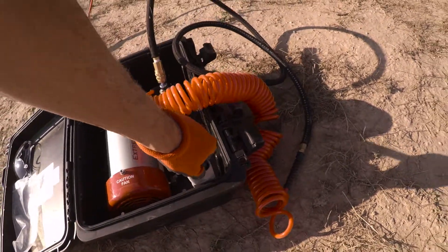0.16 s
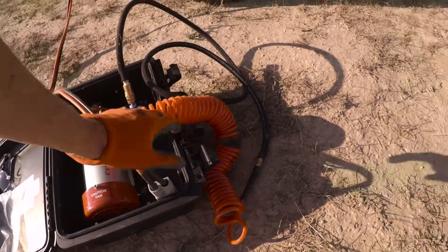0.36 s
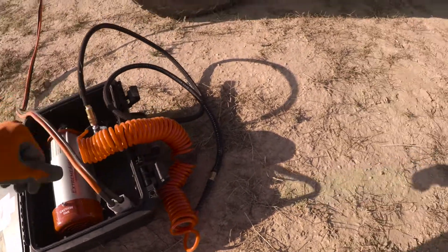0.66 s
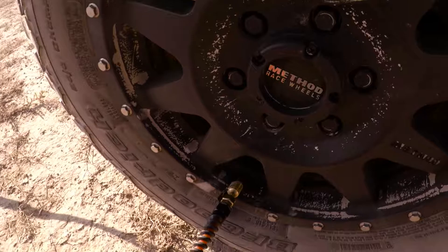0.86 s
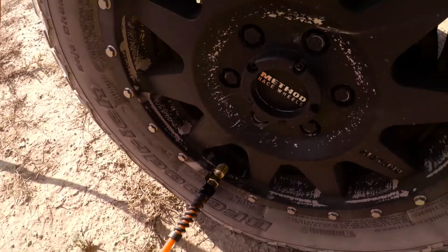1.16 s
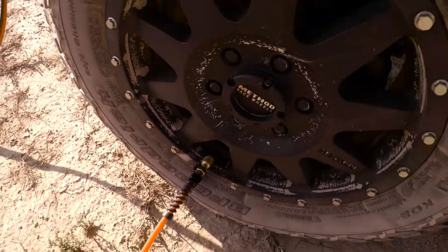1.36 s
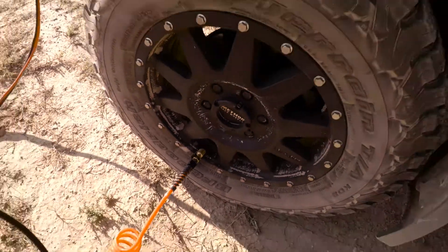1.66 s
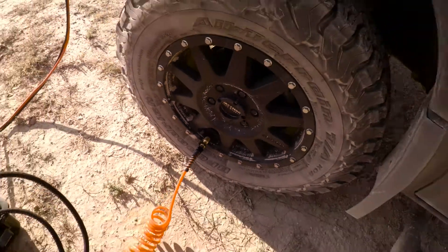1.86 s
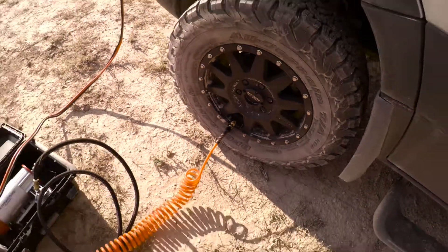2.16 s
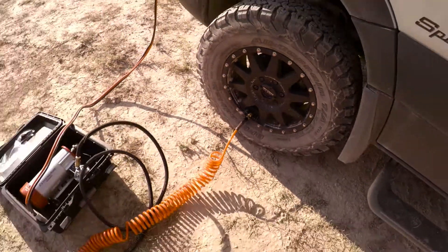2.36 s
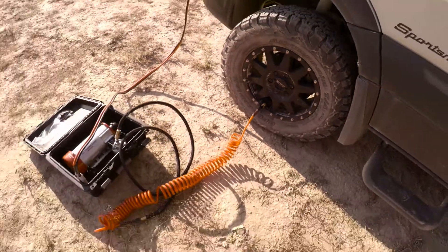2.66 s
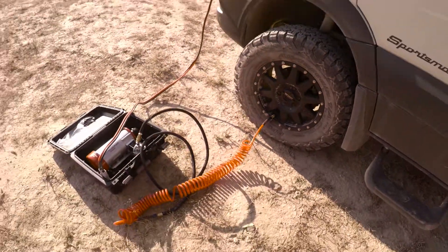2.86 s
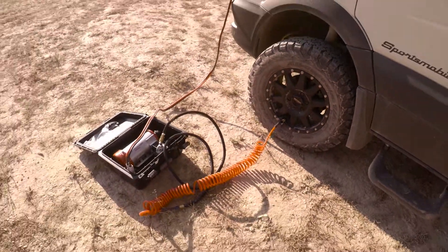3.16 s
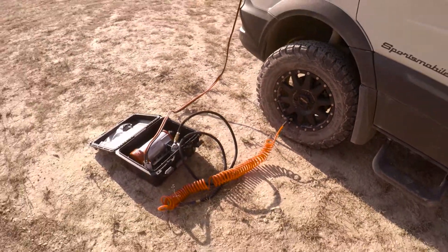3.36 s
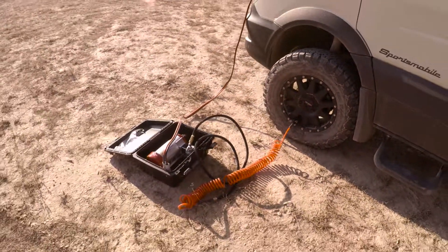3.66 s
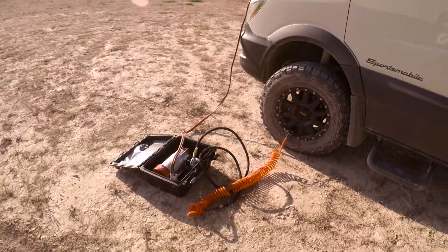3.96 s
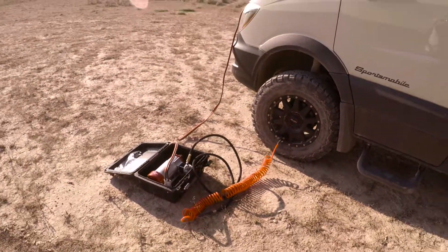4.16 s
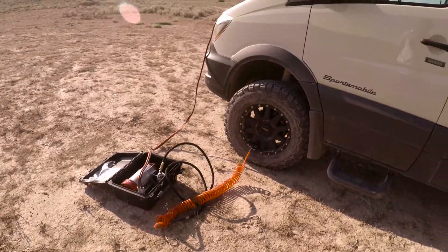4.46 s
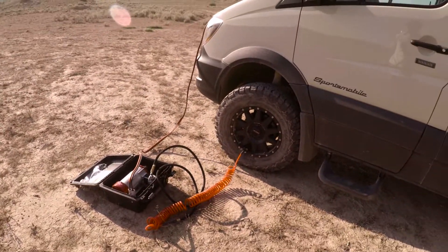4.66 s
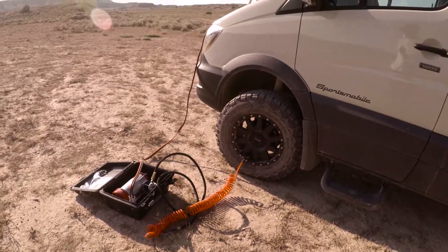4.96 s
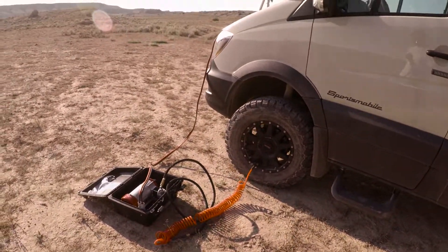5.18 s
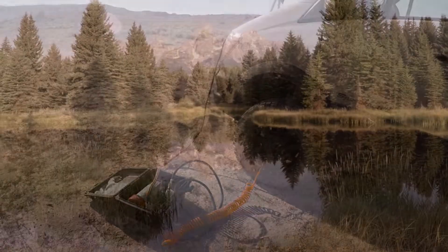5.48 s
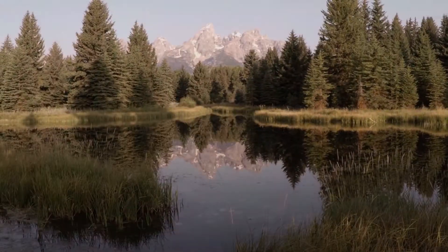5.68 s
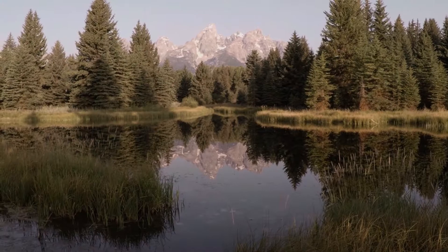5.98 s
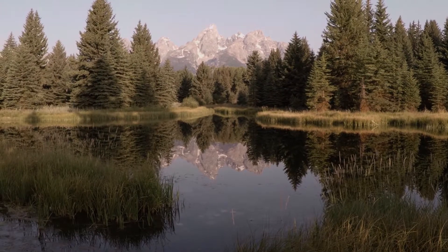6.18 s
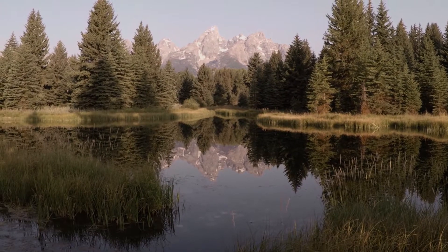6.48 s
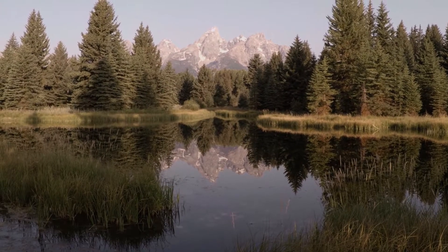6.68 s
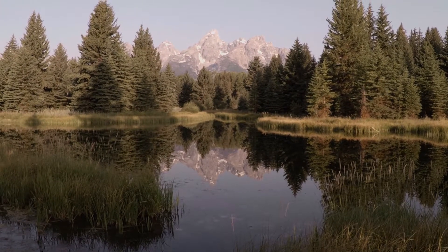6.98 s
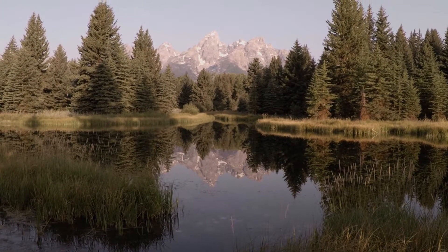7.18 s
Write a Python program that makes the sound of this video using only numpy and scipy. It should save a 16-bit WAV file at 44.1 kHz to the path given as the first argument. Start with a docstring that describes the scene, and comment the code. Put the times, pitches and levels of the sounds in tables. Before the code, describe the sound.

Outdoors, a tyre inflator drones steadily at about sixty-eight strokes per second, centred, dry and close, with low wind rumble. From two to four seconds it moves farther off, then fades out. A wide, much quieter pond scene replaces it: distant bird chatter all round, nearer short chirps, thin whistles, mewing calls and an even two-note warble, lightly echoed by trees, plus tiny water ticks.

```python
"""A portable piston compressor fills a van's tyre on open dirt: a valve click, air thump and motor whirr per turn.
The microphone backs away in a light breeze; the machine fades out, with one last brief swell.
It gives way to a quiet pond among trees, where birds whistle and chirp over small ticks and plops.
The machine is crank harmonics, shaft-locked tones and shaped noise; the birds are bending near sines."""
import sys
import numpy as np
from scipy import signal
from scipy.fft import rfft, irfft, next_fast_len
from scipy.io import wavfile

SR = 44100
rng = np.random.default_rng(int(sys.argv[2]) if len(sys.argv) > 2 else 0)


def put_to_file(sound):
    """Save the sound as 16-bit audio at rate SR, in the file named by the first command-line argument."""
    columns = np.atleast_2d(sound).T  # one column per channel
    safe = np.clip(columns, -1, 1)
    whole_steps = np.round(safe * 32767)
    wavfile.write(sys.argv[1], SR, whole_steps.astype(np.int16))


N = 323253
TIME_S = np.arange(N) / SR

# Crankshaft speed: t/s, f/Hz [turns per s]
CRANK_SPEED = [(0.1, 68.21), (0.8, 68.31), (1.6, 68.39), (2.4, 68.44), (3.1, 68.56), (3.9, 68.49),
               (4.6, 68.62)]
CRANK_HZ = CRANK_SPEED[0][1]
FIRST_STROKE_S = 0.0122
# Piston stroke, close by: harmonic [x crank rate], relative level/dB
STROKE_NEAR = [(1, -8), (2, -8), (3, -2.5), (4, -6.5), (5, -20.5), (6, -5.5), (7, -8), (8, -35.5), (9, -13),
               (10, -13.5), (11, 1), (12, -6.5), (13, 3), (14, 2.5), (15, -0.5), (16, -13), (17, -10.5),
               (18, -16), (19, -46), (20, -19), (21, -38.5), (22, -24), (23, -24), (24, -19), (25, -66),
               (26, -16.5), (27, -18.5), (28, -16), (29, -39.5), (30, -20.5), (31, -19.5), (32, -67)]
# Piston stroke, a few steps off: harmonic [x crank rate], relative level/dB
STROKE_AFAR = [(1, -12), (2, -8), (3, -2.5), (4, -6), (5, -9), (6, -5), (7, -7), (8, -28.5), (9, -14.5),
               (10, -8), (11, 1), (12, -6), (13, 1.5), (14, 0), (15, -1.5), (16, -15.5), (17, -7.5),
               (18, -16.5), (19, -30), (20, -21), (21, -31), (22, -24), (23, -26), (24, -21), (25, -44),
               (26, -18), (27, -23), (28, -19.5), (29, -49), (30, -21), (31, -21.5), (32, -33)]
# Pump and case resonances that ring after each stroke: f/Hz, width/Hz
CASE_MODES = [(100, 88), (745, 58)]
# Intake air spectrum: f/Hz, relative level/dB
INTAKE_SPECTRUM = [(60, -3), (120, -16.5), (170, -2.5), (240, -13), (290, 6), (370, 2), (500, -4),
                   (650, -5.5), (950, -5), (1250, -7), (1550, -14), (1950, -13), (2700, -18), (5000, -24)]
# Valve snap spectrum: f/Hz, relative level/dB
VALVE_SPECTRUM = [(1500, -26), (3000, -4), (5500, -7), (7500, 0), (9000, 7), (11000, -3), (13000, 4),
                  (14100, 4.5), (15200, -20)]
# Whirr spectrum: f/Hz, relative level/dB
WHIRR_SPECTRUM = [(1500, -12), (2300, 0), (3200, 1.5), (4700, 0.5), (7000, -4), (9000, -1), (11200, -8.5),
                  (13000, 0), (15200, -29)]
# Metal pump head modes: f/Hz, width/Hz, lift close by/dB, lift from afar/dB
HEAD_MODES = [(3780, 46, -5, 2.3), (6070, 300, 17, 13.6), (7985, 250, 18, 11.2), (8530, 590, 3, 6.4),
              (10080, 490, 10, 11), (12000, 340, 12.5, 11), (14300, 380, 3, 6.4)]
# Motor tones: order [x crank rate]
WHINE_ORDERS = [48, 58, 61, 86, 87, 88, 90, 116, 117, 120, 140, 145, 147, 149, 176]
# Motor tones, same order: relative level close by/dB, relative level from afar/dB
WHINE_LEVELS = [(-20.5, -11), (-14, -11.5), (-8.5, -11), (-11, -26), (-7.5, -31), (-11, -29), (-11, -9.5),
                (-7.5, -4.5), (-3, -14), (-27, -6), (-31, -26), (-7, -22), (-20, -18), (-16.5, -22),
                (-22, -24)]
# Microphone to machine: t/s, distance/m
DISTANCE = [(0, 0.71), (.35, 0.63), (1.4, 0.79), (2.25, 1.006), (3.1, 1.46), (4.05, 2.78), (5.2, 3)]
NEAR_M, AFAR_M = 0.82, 1.5  # the tone turns from close to distant between these
THUMP_DB, INTAKE_DB, METAL_DB = -34.5, -40, -45.5  # references at one metre
BODY_FALL_DB, METAL_FALL_DB = 6, 5.0  # per doubling of distance
# Machine fade and last swell: t/s, gain [0-1]
FADE = [(4.0, 0.84), (5.03, 0.02), (5.11, 0.1), (5.19, 0.32), (5.2, 0.05)]

# Breeze rumble spectrum: f/Hz, relative level/dB
BREEZE_SPECTRUM = [(1, -15), (4, 1.5), (8, -8), (15, -5), (25, -21), (40, -27), (70, -41.5), (150, -45),
                   (400, -65)]
# Breeze strength on the microphone: t/s, level/dB
WIND = [(0, -32.5), (1.2, -28.5), (1.5, -27.5), (2.6, -29), (3.5, -32.5), (4.1, -46), (4.9, -59),
        (5.15, -59), (5.35, -41), (7.33, -41.5)]
# Buffets on top: t/s, half length/s, lift/dB
BUFFETS = [(0.221, 0.037, 12), (1.372, .04, 9.5), (1.686, 0.014, 10), (2.62, .03, 7), (4.517, 0.053, 10)]

# Forest air spectrum: f/Hz, relative level/dB
FOREST_SPECTRUM = [(35, -32), (60, 1), (123, -5), (215, -9), (298, -7), (368, -8.5), (443, -8), (599, -7),
                   (953, -12), (1350, -12), (2360, -16), (3760, -17), (7200, -29.5), (14500, -42.5),
                   (15500, -36.5)]
POND_DB, POND_IN_S, POND_FULL_S = -52, 4.2, 5.07
# Far birds, strongest from 5.5 to 6.6 s: t/s, relative level/dB
CHORUS = [(4.2, -36), (5.1, -8), (5.5, -0.5), (6.6, 0), (6.9, -6), (7.33, -6)]

# High bird's falling slur: f/Hz
SLUR_HZ = [7650, 6830, 5830, 5390, 5200]
SLUR_START_S, SLUR_EVERY_S, SLUR_S = 4.655, 0.1045, 0.079
SLUR_FIRST_DB, SLUR_GROWTH_DB, SLUR_LAG_MS = -65, 2.5, 0.031
# Long mewing calls: t/s, held f/Hz, level/dB
MEWS = [(4.66, 1680, -64), (5.45, 1605, -63), (6.344, 1660, -59), (7.285, 1680, -53)]
# Mew contour, rising, holding, sagging: pitch [x held pitch]
MEW_SHAPE = [.8, 0.95, 1, 1, 0.98, 0.88]
MEW_S, MEW_LAG_MS = 0.271, 0.041
# Low hoots and whoops across the water: t/s, length/s, first f/Hz, last f/Hz, level/dB
HOOTS = [(4.817, 0.028, 614, 630, -60), (5.295, 0.034, 622, 594, -54.5), (5.433, 0.026, 1000, 1710, -52.5),
         (5.6, 0.053, 453, 510, -56.5), (5.83, 0.055, 441, 530, -53), (6.095, .04, 675, 1040, -54),
         (6.264, 0.046, 820, 1280, -56), (6.316, 0.028, 667, 437, -55), (6.49, 0.03, 717, 570, -53),
         (6.618, 0.016, 1300, 1580, -51), (7.258, 0.019, 614, 560, -53)]
HOOT_LAG_MS = 0.095
# Quick sliding chirps: t/s, length/s, first f/Hz, last f/Hz, level/dB
CHIRPS = [(5.06, .022, 3650, 3240, -58), (5.69, 0.11, 2200, 2480, -61), (5.759, .02, 4150, 3870, -53),
          (5.833, 0.045, 2330, 2880, -56), (5.948, 0.03, 3650, 4320, -56), (6.011, .032, 3990, 3380, -52.5),
          (6.045, 0.032, 3880, 3420, -57), (6.706, .02, 4300, 3600, -52), (7.025, .048, 5900, 4350, -58.5),
          (7.092, 0.028, 4280, 4590, -49)]
CHIRP_LAG_MS = 0.13
# Thin whistles on one pitch: t/s, length/s, f/Hz, level/dB
WHISTLES = [(5.115, 0.058, 2075, -58), (5.358, 0.024, 2970, -61), (5.649, 0.031, 2950, -62.5),
            (5.869, 0.065, 2940, -52.5), (6.054, .052, 3090, -54.5), (6.497, 0.16, 5960, -73),
            (6.722, 0.15, 4270, -66), (6.735, 0.18, 5860, -66.5), (6.881, .07, 3070, -67),
            (6.98, 0.18, 5890, -65), (7.13, .2, 3980, -66.5), (7.185, .055, 4360, -58),
            (7.2, 0.051, 3070, -64), (7.24, .1, 5900, -70)]
WHISTLE_LAG_MS = 0.04
# Calls that arch up and down: t/s, length/s, top f/Hz, level/dB, right-side lag/ms
ARCHES = [(5.198, .092, 5330, -59, .02), (5.472, 0.041, 3730, -53, 0.14), (5.51, 0.033, 3780, -55, 0.14),
          (5.777, 0.036, 3490, -51, 0.14), (5.809, .044, 3620, -53, .125),
          (7.229, .108, 5800, -51.5, 0.057)]
# Arch contour: pitch [x top pitch]
ARCH_SHAPE = [.77, .91, 1, .91, .71]
# Ticks and plops by the water: t/s, centre f/Hz, 60 dB ring time/s, peak level/dB
TICKS = [(5.227, 69, 0.029, -45.5), (5.379, 5360, 0.0029, -39), (6.202, 5800, 0.011, -44.5),
         (6.249, 1700, 0.018, -46), (6.277, 2000, 0.031, -41.5), (6.306, 1400, 0.018, -46),
         (6.413, 8000, .012, -48), (6.80, 1860, 0.027, -42.5), (6.905, 1590, 0.037, -43)]
# Warbler's falling note: f/Hz
ROCK_DOWN_HZ = [3120, 3030, 2770]
# Warbler's rising note: f/Hz
ROCK_UP_HZ = [2980, 3450, 3960]
ROCK_START_S, ROCK_EVERY_S, ROCK_UP_AFTER_S = 6.139, 0.0915, 0.02
ROCK_DOWN_S, ROCK_UP_S, ROCK_DB, ROCK_LAG_MS = 0.023, 0.026, -53, 0.14
# Echoes off the trees: delay/s, relative level/dB
TREES = [(.023, -9), (.047, -22), (.083, -12), (.131, -21), (0.191, -15)]
CUTOFF_HZ = 15500


def from_db(db):
    """Amplitude gain."""
    return 10 ** (np.asarray(db) / 20)


def rms_one(x):
    """Scale to rms 1."""
    return x / np.sqrt(np.mean(x ** 2) + 1e-20)


def in_time(rows):
    """A two-column curve at every sample."""
    s, values = np.transpose(rows)
    return np.interp(TIME_S, s, values)


def colour(x, spectrum):
    """Filter by a spectrum interpolated over log frequency."""
    size = next_fast_len(N)
    hz, db = np.transpose(spectrum)
    bins_hz = np.maximum(np.arange(size // 2 + 1) * SR / size, 1)
    gain = from_db(np.interp(np.log(bins_hz), np.log(hz), db))
    return irfft(rfft(x, size) * gain, size)[:N]


def noise(spectrum):
    """Coloured noise, rms 1."""
    return rms_one(colour(rng.standard_normal(N), spectrum))


def drift(knots_per_s, size=8192):
    """Random curve through straight segments, rms 1."""
    knots = rng.standard_normal(size)
    return rms_one(np.interp(TIME_S * knots_per_s, np.arange(size), knots))


def resonance(x, hz, width_hz):
    """Two-pole band-pass, gain about 1 at its peak."""
    r = np.exp(-np.pi * width_hz / SR)
    zeros = np.array([1, 0, -1]) * (1 - r * r) / 2
    poles = [1, -2 * r * np.cos(2 * np.pi * hz / SR), r * r]
    return signal.lfilter(zeros, poles, x)


def each_turn(turns, harmonics, size=4096):
    """One waveform, rms 1, repeated every turn."""
    shape = rms_one(irfft(np.r_[0, harmonics], size))
    return np.interp(turns % 1 * size, np.arange(size + 1), np.r_[shape, shape[0]])


def thump(turns, far, push_lead_turns=0.07, puff_lag_turns=0.1144, wobble_turns=0.00072,
          wander_db=1.13, push_harmonics=8):
    """The piston's low push, then a puff of air; pump and case resonances set the harmonics' phases."""
    shaky = turns + wobble_turns * drift(60)
    out = np.zeros(N)
    for k, ((_, near_db), (_, far_db)) in enumerate(zip(STROKE_NEAR, STROKE_AFAR), 1):
        gain = from_db(near_db + far * (far_db - near_db) + wander_db * drift(3.94))
        lead = push_lead_turns if k <= push_harmonics else -puff_lag_turns
        ring_phase = sum(2 * np.arctan(2 * (k * CRANK_HZ - hz) / width_hz) for hz, width_hz in CASE_MODES)
        out += gain * np.cos(2 * np.pi * k * (shaky + lead) - ring_phase)
    return rms_one(out)


def intake_air(turns, suck_db=3, suck_turn=0.73):
    """Intake noise that swells once per turn."""
    return noise(INTAKE_SPECTRUM) * from_db(suck_db * np.cos(2 * np.pi * (turns - suck_turn)))


def valve(turns, jitter_turns=0.0002, bounce_db=-12, bounce_s=0.00041):
    """One dry snap per turn plus a very short noise chatter as the reed settles."""
    angle = turns + jitter_turns * drift(68)
    # Steps up by one as the valve opens, with sub-sample timing
    steps = np.floor(angle) + np.minimum(angle % 1 * SR / CRANK_HZ, 1)
    snaps = np.diff(steps, prepend=steps[0]) * from_db(1.1 * drift(68))
    settling = signal.lfilter([1], [1, -np.exp(-1 / (bounce_s * SR))], snaps + 1e-18)
    chatter = rms_one(settling * rng.standard_normal(N))
    return rms_one(colour(rms_one(snaps) + from_db(bounce_db) * chatter, VALVE_SPECTRUM))


def whirr(turns, far, hiss_db=-13, harmonics=226):
    """Gear and brushes rattle alike each turn, hardest just after the valve; the metal head resonates."""
    shaky = turns + 0.00022 * drift(45)
    angle = shaky % 1
    rattle = each_turn(shaky, np.exp(2j * np.pi * rng.random(harmonics)))
    hiss = from_db(hiss_db) * rng.standard_normal(N)
    burst_db = 7 * (1 - far / 2) * np.exp(-angle / 0.12)
    load = from_db(burst_db + 2.3 * np.cos(2 * np.pi * (angle - 0.2)))
    sound = colour(load * (rattle + hiss), WHIRR_SPECTRUM)
    for hz, width_hz, near_db, far_db in HEAD_MODES:
        lift = from_db(near_db + far * (far_db - near_db)) - 1
        sound = sound + lift * resonance(sound, hz, width_hz)
    return rms_one(sound)


def whine(turns, far, throb_db=0.3, throb_turn=0.0655):
    """Thin shaft-locked motor tones, louder after each snap; their balance changes with distance."""
    out = np.zeros(N)
    for order, (near_db, far_db) in zip(WHINE_ORDERS, WHINE_LEVELS):
        waver_db, slip_rad = 1.2 * drift(7), 0.4 * drift(12)
        gain = from_db(near_db + far * (far_db - near_db) + waver_db)
        out += np.sqrt(2) * gain * np.sin(2 * np.pi * order * (turns - throb_turn) + slip_rad)
    return out * from_db(throb_db * np.cos(2 * np.pi * (turns - throb_turn)))


def compressor(valve_db=-5.5, whirr_db=-1.0, whine_db=-2, valve_lead_turns=0.02205):
    """All parts follow one crankshaft, weaken with distance and fade together."""
    turns = np.cumsum(in_time(CRANK_SPEED)) / SR - FIRST_STROKE_S * CRANK_HZ
    early = turns + valve_lead_turns
    metres = in_time(DISTANCE)
    doublings = np.log2(metres)
    far = np.clip((metres - NEAR_M) / (AFAR_M - NEAR_M), 0, 1)
    body = from_db(THUMP_DB) * thump(turns, far) + from_db(INTAKE_DB) * intake_air(turns)
    metal = from_db(valve_db) * valve(early)
    metal += from_db(whirr_db) * whirr(early, far)
    metal += from_db(whine_db) * whine(turns, far)
    body *= from_db(-BODY_FALL_DB * doublings)
    metal *= from_db(METAL_DB - METAL_FALL_DB * doublings)
    return (body + metal) * in_time(FADE)


def breeze(gusty_db=2.5, gust_knots_per_s=7):
    """Low noise on the microphone that swells at random, with a few harder buffets."""
    lift_db = sum(db * np.exp(-((TIME_S - s) / half_s) ** 2) for s, half_s, db in BUFFETS)
    return noise(BREEZE_SPECTRUM) * from_db(in_time(WIND) + gusty_db * drift(gust_knots_per_s) + lift_db)


def sing(notes, waver=0.0065, flutter_db=2.5, edge=0.32, shade_db=12):
    """Notes (t/s, length/s, pitches/Hz, level/dB, right-side lag/ms): near sines bent through pitches."""
    out = np.zeros((2, 2 * N))  # room for notes that overrun
    bend = 1 + waver * drift(250)
    flutter = from_db(flutter_db * drift(120))
    for s, length_s, pitches, db, lag_ms in notes:
        at = int(s * SR) + np.arange(int(length_s * SR))
        contour = np.polyfit(np.linspace(0, 1, len(pitches)), pitches, len(pitches) - 1)
        hz = np.polyval(contour, np.linspace(0, 1, len(at))) * bend[at % N]
        cycles = np.cumsum(hz) / SR - np.outer([0, lag_ms / 1000], hz)
        pan_db = shade_db * (cycles[0] - cycles[1])  # the far side is shaded, more so for high notes
        gain = np.sqrt(2) * from_db(db + np.outer([1, -1], pan_db) / 2)
        out[:, at] += gain * signal.windows.tukey(len(at), edge) * np.sin(2 * np.pi * cycles)
    return out[:, :N] * flutter


def far_calls(low_hz, high_hz, level_db, count, spread_db=9, glide=0.112, widest_lag_ms=0.19):
    """Faint short glides from all round the pond, at random times and pitches."""
    when, pitch, slope, size, span, side = rng.random((count, 6)).T
    hz = low_hz * (high_hz / low_hz) ** pitch
    step = 1 + glide * (2 * slope - 1)
    starts_s = POND_IN_S + when * (N / SR - POND_IN_S)
    lengths_s = 0.0127 + 0.0268 * span
    levels_db = level_db - spread_db * size
    lags_ms = widest_lag_ms * (2 * side - 1)
    return sing(zip(starts_s, lengths_s, np.c_[hz / step, hz * step], levels_db, lags_ms))


def slur_run(count=5):
    """Evenly spaced falling slurs in a crescendo."""
    return [(SLUR_START_S + k * SLUR_EVERY_S, SLUR_S, SLUR_HZ,
             SLUR_FIRST_DB + k * SLUR_GROWTH_DB, SLUR_LAG_MS) for k in range(count)]


def mews():
    """Long calls that rise, hold and sag."""
    return [(s, MEW_S, hz * np.array(MEW_SHAPE), db, MEW_LAG_MS) for s, hz, db in MEWS]


def slides(rows, lag_ms):
    """Notes that glide straight from first to last pitch: hoots or chirps."""
    return [(s, length_s, [first, last], db, lag_ms) for s, length_s, first, last, db in rows]


def whistles():
    """Thin notes on one pitch."""
    return [(s, length_s, [hz], db, WHISTLE_LAG_MS) for s, length_s, hz, db in WHISTLES]


def arches():
    """Calls that bend up to a top pitch and down again."""
    return [(s, length_s, hz * np.array(ARCH_SHAPE), db, lag_ms) for s, length_s, hz, db, lag_ms in ARCHES]


def rocking_song(count=6):
    """A warbler's overlapping pair, falling then rising, at an even pace."""
    starts_s = ROCK_START_S + ROCK_EVERY_S * np.arange(count)
    down = [(s, ROCK_DOWN_S, ROCK_DOWN_HZ, ROCK_DB, ROCK_LAG_MS) for s in starts_s]
    up = [(s + ROCK_UP_AFTER_S, ROCK_UP_S, ROCK_UP_HZ, ROCK_DB, ROCK_LAG_MS) for s in starts_s]
    return down + up


def birds():
    """The nearer birds; the whistles waver less in pitch."""
    bending = slur_run() + mews() + slides(HOOTS, HOOT_LAG_MS) + slides(CHIRPS, CHIRP_LAG_MS)
    bending += arches() + rocking_song()
    return sing(bending) + sing(whistles(), waver=0.0038)


def ticks(breadth=0.38, size=4096):
    """Short dying noise bursts, each through a broad resonance with steep sides."""
    out = np.zeros(N)
    for s, hz, t60_s, db in TICKS:
        burst = rng.standard_normal(size) * from_db(-60 * TIME_S[:size] / t60_s)
        for _ in range(2):
            burst = resonance(burst, hz, breadth * hz)
        start = int(s * SR)
        out[start:start + size] += from_db(db) * burst / np.abs(burst).max()
    return out


def trees(x, tail_db=-9, t60_s=0.21, echo_db=-2.5):
    """A few discrete echoes and a thin scattered tail."""
    response = rng.standard_normal(SR) * from_db(-60 * TIME_S[:SR] / t60_s)
    response *= from_db(tail_db) / np.linalg.norm(response)
    for delay_s, db in TREES:
        response[int(delay_s * SR)] += from_db(db + echo_db)
    return signal.fftconvolve(x, response)[:N]


def pond(air_db=-1.5, side_db=-3):
    """Forest air and far chatter fade in; nearer calls and ticks echo off the trees."""
    air = noise(FOREST_SPECTRUM) + from_db(side_db) * noise(FOREST_SPECTRUM) * np.array([[1], [-1]])
    chatter = far_calls(2700, 4400, level_db=-5, count=90, glide=0.147)
    chatter += far_calls(480, 2287, level_db=-2, count=60)
    fade_in = np.clip((TIME_S - POND_IN_S) / (POND_FULL_S - POND_IN_S), 0, 1)
    distant = from_db(air_db) * air * fade_in + chatter * from_db(in_time(CHORUS))
    calls = birds() + ticks()
    echoes = np.array([trees(side) for side in calls])
    return from_db(POND_DB) * distant + calls + echoes


def scene():
    """Machine and breeze dead centre; the pond lies all around."""
    return compressor() + breeze() + pond()


def record(dry):
    """Steep elliptic low-pass."""
    return signal.sosfilt(signal.ellip(12, 0.1, 90, CUTOFF_HZ, fs=SR, output="sos"), dry)


dry = scene()
out = record(dry)
put_to_file(out)
```